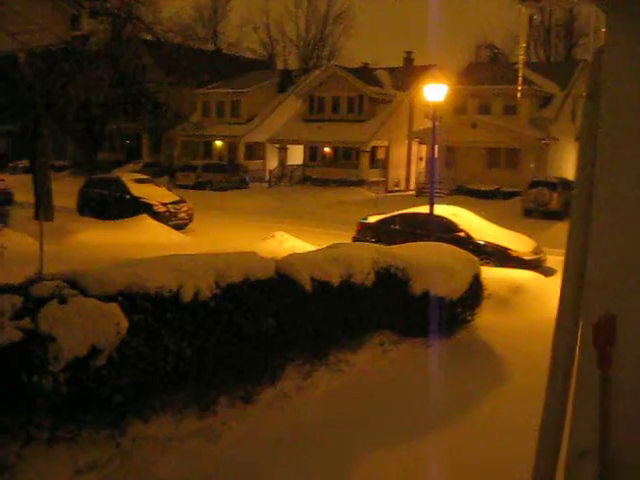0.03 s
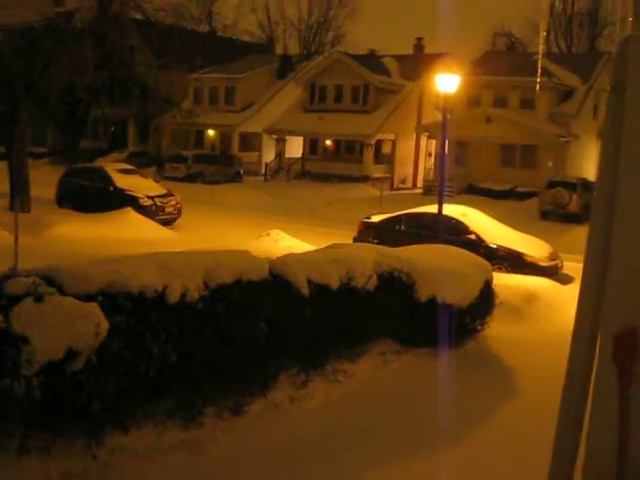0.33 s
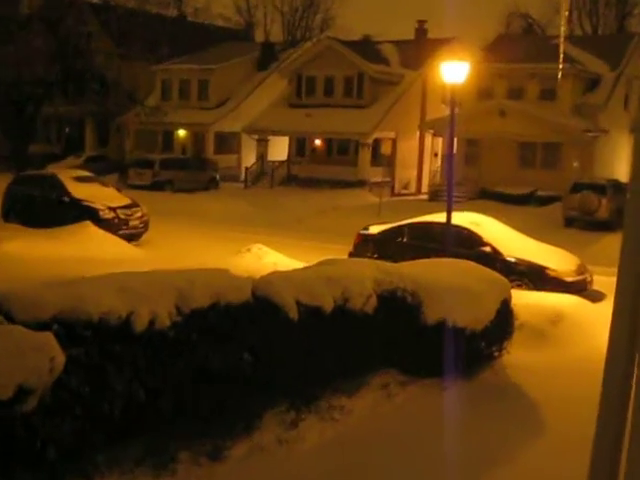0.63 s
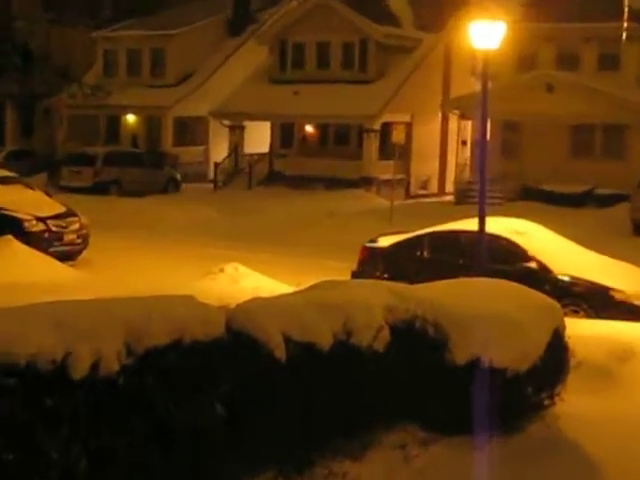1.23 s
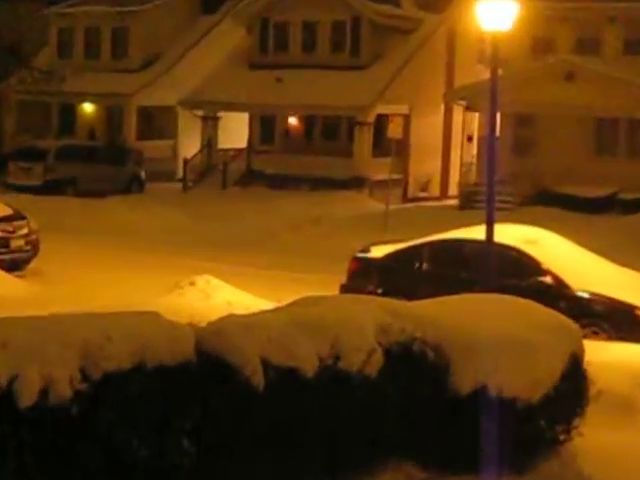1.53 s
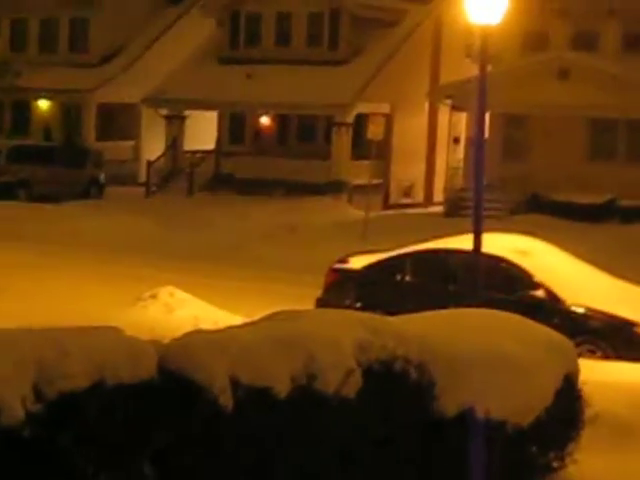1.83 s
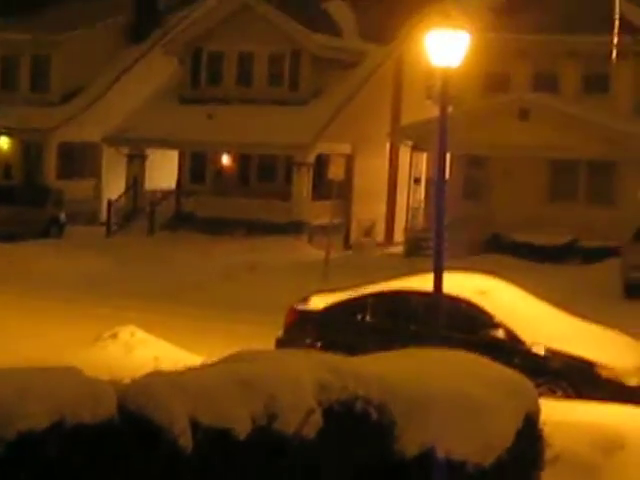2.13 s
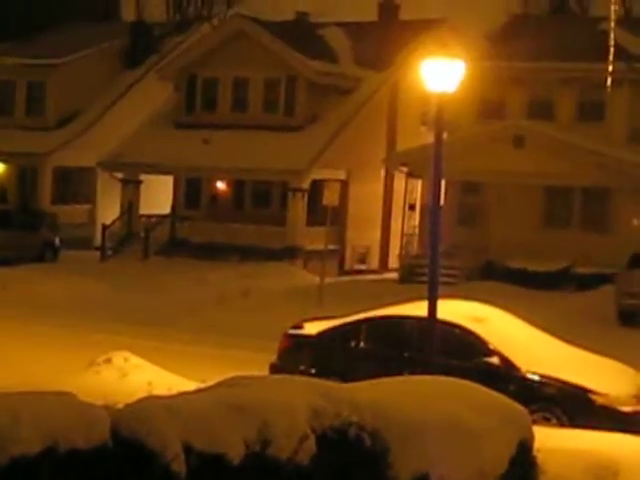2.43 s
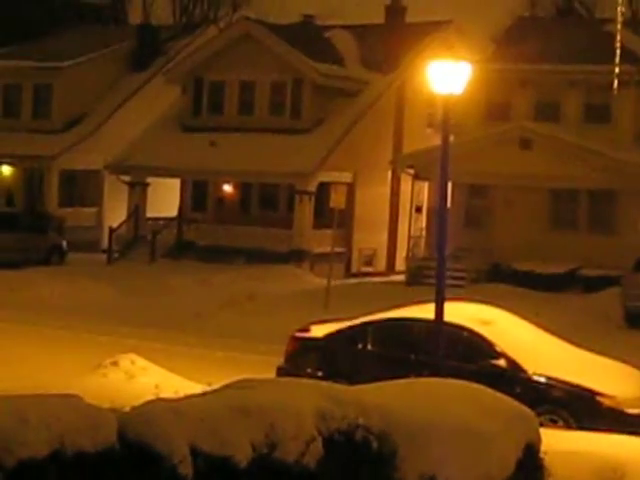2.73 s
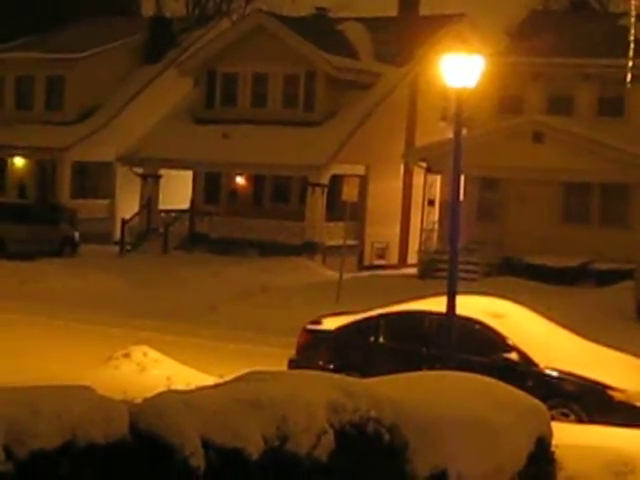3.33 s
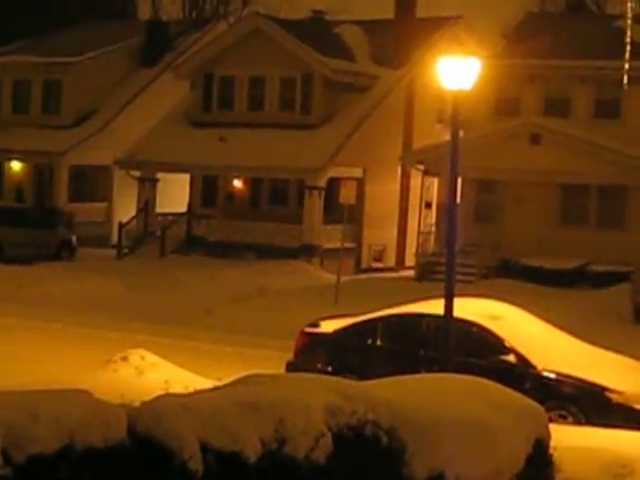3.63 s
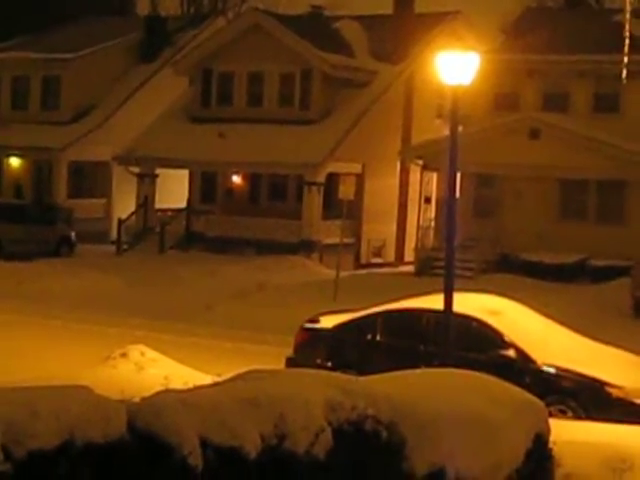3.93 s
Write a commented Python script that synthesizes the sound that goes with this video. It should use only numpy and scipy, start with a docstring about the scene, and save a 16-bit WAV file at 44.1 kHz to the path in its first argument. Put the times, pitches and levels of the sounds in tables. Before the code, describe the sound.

Freezing rain falls throughout, with ice pellets ticking and crackling on crusted snow over a soft hiss and a faint, low town rumble. A drop hits a hard surface at about 0.3 seconds with the loudest, sharpest tap. Lighter taps come around 1.3, 3.5 and 3.9 seconds. The close ticks grow more frequent from 2 seconds and thicken into a louder flurry around 3 to 3.4 seconds.

```python
"""Ice pellets tick and shatter over a soft hiss: freezing rain on a snowy street at night.
Each pellet cracks on the ice crust, makes it ring and scatters shards; countless far grains blur into
the hiss. The sleet comes in flurries that thicken near the end. A few fat drops tap on hard surfaces
or thud into snow; two faint, rough swells lead into the loudest tap. A faint high tone comes and goes
once, and the town rumbles low underneath."""
import sys
import numpy as np
from scipy import signal
from scipy.fft import rfft, irfft, next_fast_len
from scipy.io import wavfile
from scipy.ndimage import uniform_filter1d, map_coordinates

SR = 44100
rng = np.random.default_rng(int(sys.argv[2]) if len(sys.argv) > 2 else 0)


def store_pcm(level_fs):
    """Save levels as 16-bit WAV."""
    pcm = np.round(np.clip(level_fs, -1, 1) * 32767).astype(np.int16)
    wavfile.write(sys.argv[1], SR, np.atleast_2d(pcm).T)


N = 176400

# the closest pellets: (time [s], level [dB], treble boost [dB], pitch of the crust's ring [Hz])
CLOSE_PELLETS = [(0.0337, -31.5, 17, 2300), (.068, -31, 5.5, 2290), (.447, -26.5, 8.5, 3540),
                 (.457, -29, 28, 4600), (.7971, -26.5, 3, 4200), (0.8847, -25.5, 12.5, 2380),
                 (1.084, -24.5, 9.5, 6530), (1.6876, -29.5, 3, 4400), (2.032, -26.5, 1, 2550),
                 (2.0837, -31, 1, 6200), (2.1145, -31, 1, 3530), (2.1529, -30, 6, 5700),
                 (2.157, -29, 8, 2300), (2.2213, -34, -3, 3000), (2.2734, -30.5, 4.5, 5400),
                 (2.3111, -24, 6, 2950), (2.312, -26.5, 10, 5650), (2.3835, -32, 2.5, 2480),
                 (2.5148, -31.5, 3.5, 2850), (2.6039, -28, 0.5, 3360), (2.6663, -32, -3, 3300),
                 (2.6891, -29, 5, 2340), (2.7149, -25, 1, 5960), (2.9026, -26.5, 0.5, 3420),
                 (2.9484, -26.5, 14.5, 6400), (2.971, -30.5, 1, 2570), (2.983, -26.5, 2, 4500),
                 (3.0629, -26, 9.5, 6150), (3.0882, -22.5, 11.5, 2700), (3.115, -23, 4.5, 4310),
                 (3.155, -26, 5, 4420), (3.166, -25.5, 4, 6500), (3.2158, -25.5, 4, 2800),
                 (3.239, -27.5, 8, 2300), (3.2635, -23, -0.5, 2700), (3.2778, -23, 10, 5700),
                 (3.2981, -29, 7, 3400), (3.339, -25, 3, 2680), (3.4322, -29.5, 3.5, 4650),
                 (3.6705, -31.5, -1.5, 2600), (3.9272, -29.5, -4.5, 3470), (3.9545, -24, 4.5, 5940)]
# the tone colour of a hit on the ice crust: (frequency [Hz], level [dB])
CRUST_SPECTRUM = [(100, -39.5), (450, -10.5), (850, -4.5), (1500, -6), (2600, -1), (6000, -1), (10000, -5),
                  (15000, -2)]
# how hard the sleet falls: (time [s], level [dB])
FLURRY_LEVELS = [(0, -41.0), (0.399, -40.5), (0.73, -43.0), (1.031, -40.0), (1.35, -41.5), (1.801, -44),
                 (2.079, -41.5), (2.56, -44.0), (2.721, -38.0), (2.83, -43.5), (2.97, -37.5), (3.04, -40.0),
                 (3.14, -33.5), (3.2, -38.0), (3.27, -36.5), (3.43, -37.5), (3.549, -39), (3.801, -38.5),
                 (3.88, -37.0), (4.0, -39.5)]
# two faint, rough swells near 3.2 kHz just before the loud tap, then the taps of fat drops:
# (time [s], level [dB], starting pitch [Hz], rise time [s])
SWELLS_AND_TAPS = [(.198, -40.5, 3230, 0.0034), (0.246, -31, 3140, 0.0057), (.2594, -5.5, 2930, 0.00056),
                   (0.531, -29.5, 3030, 0.00087), (1.2406, -24, 2580, .0013),
                   (1.2893, -20.5, 2780, 0.00032), (3.4878, -15.5, 3290, 0.00049),
                   (3.8626, -17.5, 3350, 0.00035), (3.882, -24.5, 2500, 0.0011),
                   (3.8843, -18.5, 3080, 0.0025)]
# the notes of the hard surface under the drops: (pitch [Hz], level [dB])
SURFACE_NOTES = [(1230, -17), (1750, -14), (4700, -27)]
# drops landing in snow: (time [s], level [dB], pitch [Hz])
SNOW_DROPS = [(1.24, -25.5, 635), (2.534, -32.5, 690), (2.604, -29, 1065), (2.939, -26, 810),
              (2.942, -32, 281), (3.089, -32, 670), (3.927, -33, 845)]
# one faint high tone: (middle time [s], half length [s], pitch [Hz], peak level [dB])
THIN_TONE = (1.26, .07, 5905, -51)
# the tone colour of far sleet: (frequency [Hz], level [dB])
HISS_SPECTRUM = [(100, -43), (400, -6.5), (1000, -4.5), (2400, -1), (4200, -1), (6300, -2.5), (10000, -1.5),
                 (15500, -3.5)]
# the tone colour of the town: (frequency [Hz], level [dB])
TOWN_SPECTRUM = [(20, -7.5), (35, -13.5), (60, -4), (110, -4), (170, -0.5), (250, -0.5), (330, -7),
                 (600, -9), (1500, -24), (5000, -48)]

CALM_DB = -42  # the flurry level that counts as calm
RATE_GROWS, SIZE_GROWS, DULL_GROWS = 0.3, 1.03, 0.73  # dB of change per dB of flurry
MIDDLE_HZ, TREBLE_HZ, TOP_HZ = 4280, 12000, 15850  # the treble boost builds from middle to treble
GRAIN = 2048  # samples in one short sound


def pellet_ticks(times, level_db, treble_db, ring_hz, shatter_db, ring_db=7, ring_width=0.13):
    """Each pellet cracks and rings the crust where it lands, then its shards skitter away."""
    t, hz = np.arange(GRAIN) / SR, np.fft.rfftfreq(GRAIN, 1 / SR)
    crack = (1 - np.exp(-t / 0.000093)) * fade(t, 0.0066)
    shatter = amp(shatter_db)[:, None] * fade(t, 0.042)
    burst = np.hypot(crack / crack.max(), shatter) * rng.standard_normal((len(times), GRAIN))
    off_pitch = np.log((hz + 1) / ring_hz[:, None]) / ring_width
    ring = ring_db / (1 + off_pitch ** 2)
    boost = treble_db[:, None] * along([(MIDDLE_HZ, 0), (TREBLE_HZ, 1)], hz)
    spectra = rfft(burst) * causal(amp(along(CRUST_SPECTRUM, hz) + boost + ring))
    onset = irfft(spectra * (hz < TOP_HZ))[:, t < 0.003]  # the first 3 ms set the level
    gain = amp(level_db) / np.sqrt(np.mean(onset ** 2, axis=1))
    return placed(times, irfft(spectra) * gain[:, None])


def close_pellets(gain_db=1):
    """Pellets hit the crust right by the listener; the brightest ones shatter least."""
    times, level_db, treble_db, ring_hz = np.transpose(CLOSE_PELLETS)
    shatter_db = -2.5 - 0.55 * np.maximum(treble_db, 0)
    return pellet_ticks(times, level_db + gain_db, treble_db, ring_hz, shatter_db)


def pellet_shower(calm_per_s, calm_db, spread_db, treble_db, low_hz=2300, high_hz=6560):
    """Pellets land further off at random moments; a flurry brings more, bigger and duller ones."""
    strength = flurry()
    fallen = np.cumsum(calm_per_s * amp(RATE_GROWS * strength)) / SR  # pellets so far
    jitter, size, colour, shatter, spot = rng.uniform(-1, 1, (int(fallen[-1]), 5)).T
    landing = np.searchsorted(fallen, (np.arange(len(jitter)) + jitter) % fallen[-1])
    level_db = calm_db + SIZE_GROWS * strength[landing] + spread_db * np.sqrt(3) * size
    boost_db = treble_db - DULL_GROWS * strength[landing] + 4 * np.sqrt(3) * colour
    ring_hz = low_hz * (high_hz / low_hz) ** ((spot + 1) / 2)
    return pellet_ticks(landing / SR, level_db, boost_db, ring_hz, shatter_db=-6.5 + 7 * shatter)


def swells_and_taps(pitch_rise=0.069, ring_db=-9, ring_s=0.011, splash_db=-2.5, rough=0.16):
    """Two faint, rough swells, then drops tapping: each is a rising tone, a faint ring and noise."""
    times, level_db, hz, rise_s = np.transpose(SWELLS_AND_TAPS)[:, :, None]
    t = np.arange(GRAIN) / SR
    swell = (t / rise_s * np.exp(1 - t / rise_s)) ** 3
    ring = (1 - np.exp(-(t / rise_s) ** 2)) * fade(t, ring_s)
    uneven = unit(uniform_filter1d(rng.standard_normal(swell.shape), size=40)) * (1 - fade(t, ring_s))
    pitch_hz = hz * (1 + pitch_rise * t / (t + 2 * rise_s))
    phase = 2 * np.pi * np.cumsum(pitch_hz, axis=1) / SR
    tone = (swell + amp(ring_db) * ring) * np.sin(phase + np.pi * rough * uneven)
    surface = ring * sum(amp(db) * np.sin(2 * np.pi * note_hz * t) for note_hz, db in SURFACE_NOTES)
    splash = amp(splash_db) * fade(t, 8 * rise_s) * rng.standard_normal(swell.shape)
    band = signal.butter(3, [900, 4900], "band", fs=SR, output="sos")
    return placed(times[:, 0], amp(level_db) * signal.sosfilt(band, tone + surface + splash))


def snow_thuds(attack_s=0.00063, fade_s=0.018, rough=0.67):
    """Drops that sink into snow give a dull, low, uneven pat."""
    times, level_db, hz = np.transpose(SNOW_DROPS)[:, :, None]
    t = np.arange(GRAIN) / SR
    uneven = unit(uniform_filter1d(rng.standard_normal((len(times), GRAIN)), size=60))
    phase = 2 * np.pi * hz * t
    tone = np.sin(phase) + rough * uneven * np.cos(phase)
    loudness = (1 - np.exp(-t / attack_s)) * fade(t, fade_s)
    return placed(times[:, 0], amp(level_db) * loudness * tone)


def far_hiss(calm_db=-42, flutter_db=1.8):
    """Countless far grains blur into a fluttering hiss that swells with the flurries."""
    level_db = calm_db + 0.55 * flurry() + flutter_db * wobble(40.6)
    return amp(level_db) * noise(HISS_SPECTRUM)


def town_rumble(level_db=-53):
    """The town makes a low, steady noise."""
    return amp(level_db) * noise(TOWN_SPECTRUM)


def thin_tone():
    """A faint, wavering high tone comes and goes."""
    middle_s, half_s, hz, peak_db = THIN_TONE
    t = np.arange(N) / SR
    swell = np.exp(-((t - middle_s) / half_s) ** 2)
    return amp(peak_db) * swell * np.sin(2 * np.pi * hz * t + 1.1 * wobble(70))


def flurry():
    """How hard the sleet falls at each sample, in dB above calm."""
    return np.interp(np.arange(N) / SR, *np.transpose(FLURRY_LEVELS)) - CALM_DB


def amp(db):
    """Turn decibels into a number to multiply by."""
    return 10 ** (np.asarray(db) / 20)


def unit(x):
    """Scale each row to an average power of 1."""
    return x / np.sqrt(np.mean(x ** 2, axis=-1, keepdims=True) + 1e-20)


def along(points, hz):
    """Join (frequency, value) points with straight lines on a log frequency axis."""
    point_hz, values = np.transpose(points)
    return np.interp(np.log(hz + 1), np.log(point_hz + 1), values)


def fade(t, fade_s):
    """Die away by 60 dB in fade_s seconds."""
    return np.exp(-np.log(1000) * t / fade_s)


def wobble(per_s):
    """A smooth curve through per_s random values a second."""
    return map_coordinates(rng.standard_normal(400), [np.arange(N) * per_s / SR], mode="wrap")


def filtered(x, response):
    """Scale each frequency in x by response(hz)."""
    size = next_fast_len(N + SR // 2)
    return irfft(rfft(x, size) * response(np.fft.rfftfreq(size, 1 / SR)), size)[:N]


def noise(spectrum):
    """Noise with the given tone colour and an average power of 1."""
    return unit(filtered(rng.standard_normal(N), lambda hz: amp(along(spectrum, hz))))


def causal(gain):
    """Filters with these gains, one per row, that ring only after a hit (minimum phase)."""
    cepstrum = irfft(np.log(gain))
    one_sided = np.r_[1, np.full(GRAIN // 2 - 1, 2), 1, np.zeros(GRAIN // 2 - 1)]
    return np.exp(rfft(cepstrum * one_sided))


def placed(times, grains):
    """Add short sounds, one per row, into the scene at their times."""
    index = np.round(np.abs(times) * SR).astype(int)[:, None] + np.arange(GRAIN)
    return np.bincount(index.ravel(), grains.ravel(), N)[:N]


def scene():
    """Mix the background, the drops and pellets at three distances into one channel."""
    sound = far_hiss() + town_rumble() + swells_and_taps() + snow_thuds() + thin_tone() + close_pellets()
    near = pellet_shower(calm_per_s=60, calm_db=-37.5, spread_db=2, treble_db=10)
    fine = pellet_shower(calm_per_s=220, calm_db=-44.5, spread_db=1.5, treble_db=7.5)
    return (sound + near + fine)[None]


def record(dry, notch_hz=7880, width_hz=2100):
    """Take out a narrow band of treble and everything above TOP_HZ."""
    notch = lambda hz: (notch_hz ** 2 - hz ** 2) / (notch_hz ** 2 - hz ** 2 + 1j * hz * width_hz)
    return filtered(dry[0], lambda hz: notch(hz) * (hz < TOP_HZ))[None]


dry = scene()
out = record(dry)
store_pcm(out)
```